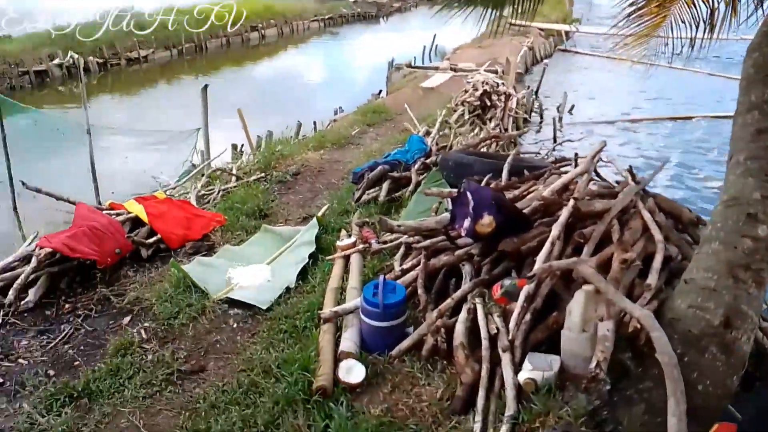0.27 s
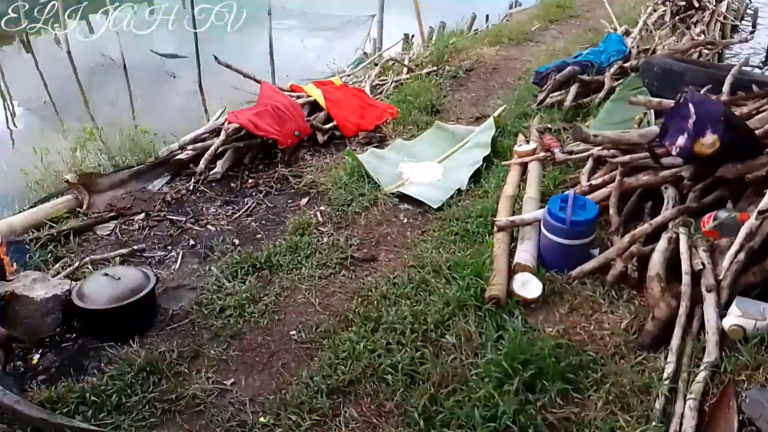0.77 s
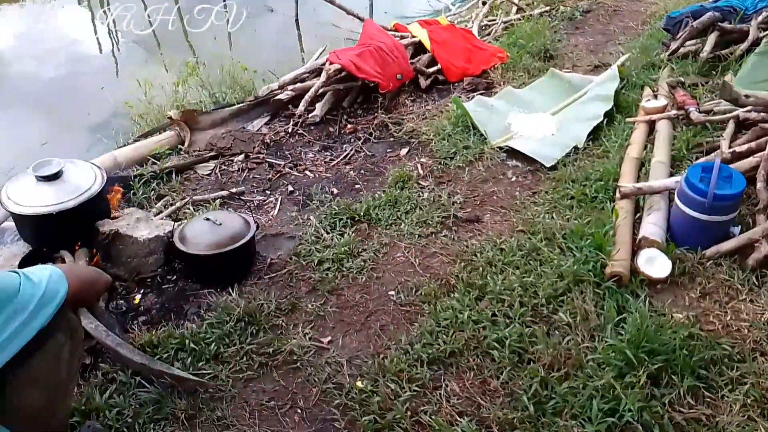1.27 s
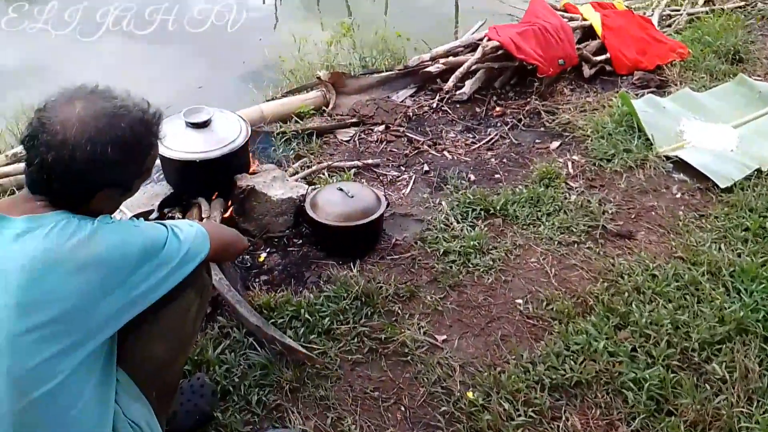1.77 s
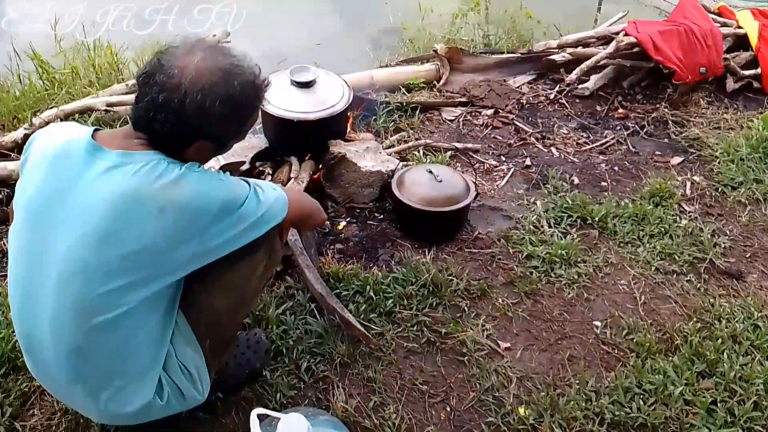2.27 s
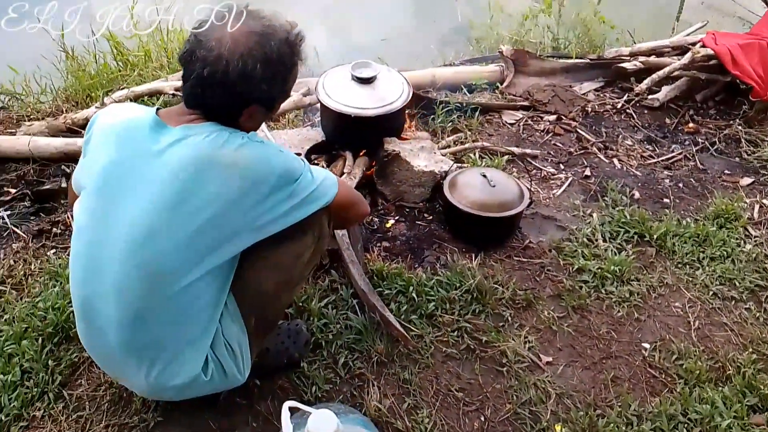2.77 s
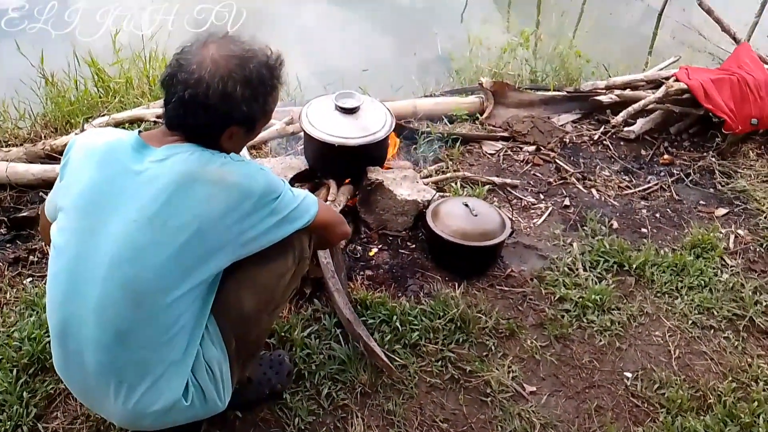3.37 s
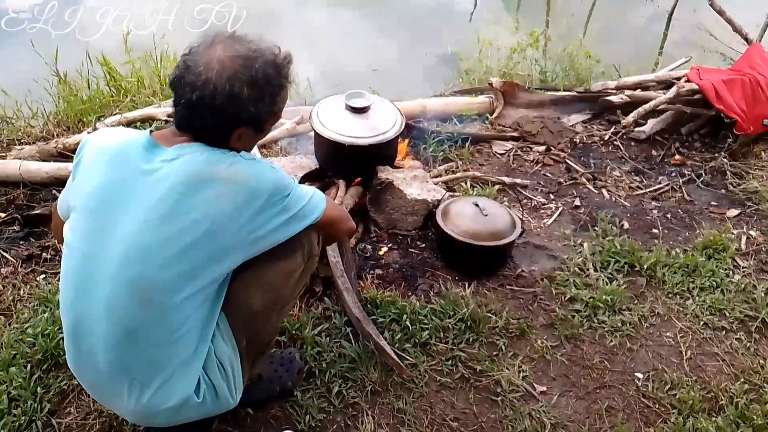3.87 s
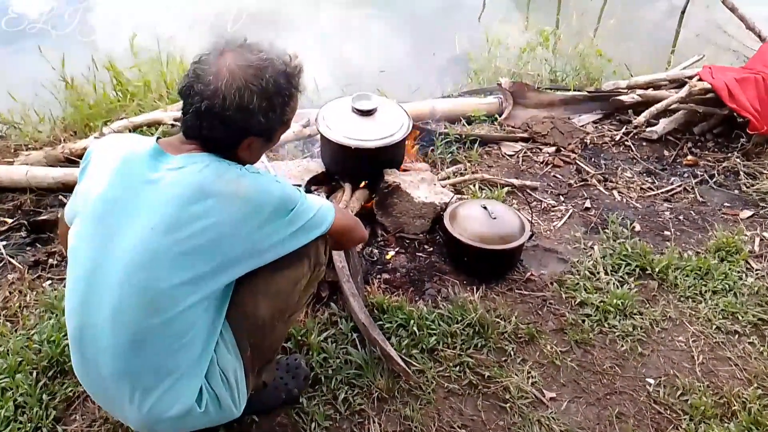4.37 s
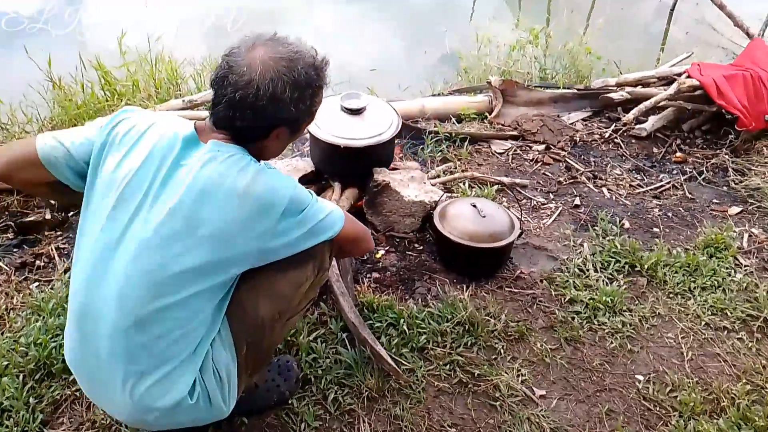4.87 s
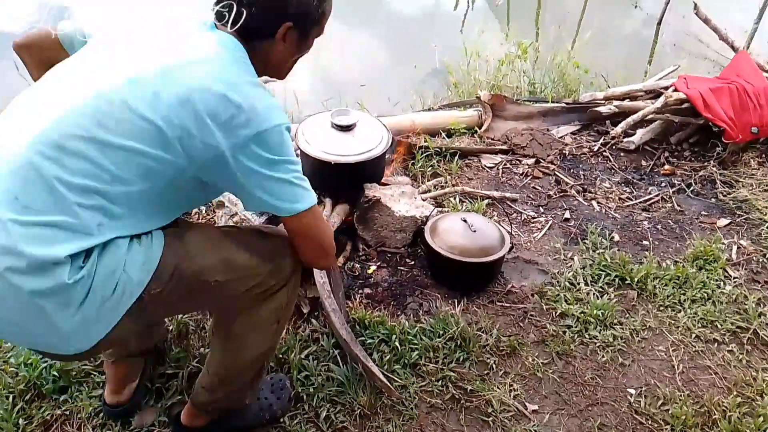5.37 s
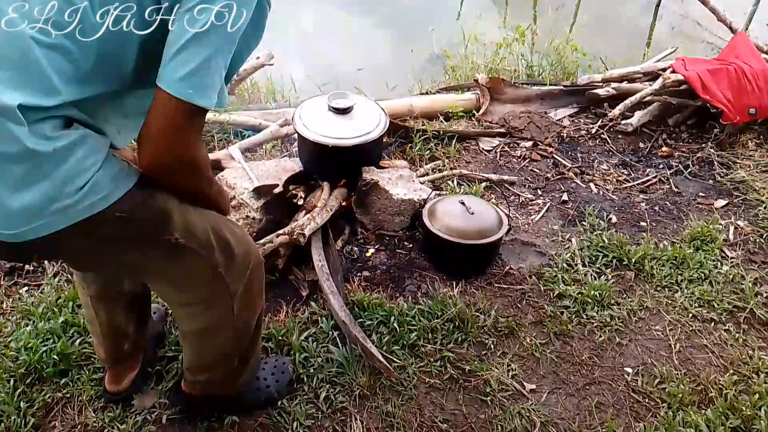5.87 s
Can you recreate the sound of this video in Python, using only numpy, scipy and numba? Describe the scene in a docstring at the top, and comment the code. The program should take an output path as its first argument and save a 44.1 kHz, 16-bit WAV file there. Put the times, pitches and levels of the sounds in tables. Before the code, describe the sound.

Outdoors at the waterside, a hand-held phone a few metres away hears a knife scaling a fish on a wooden board. From 0 s, short gritty strokes come several per second, with small gaps, scales popping in a dense dry rattle; brief squeaks near 2 kHz slide at 0.8-1.1 s and about 2.1 and 2.4 s. Light phone taps fall around 0.6 s, a chattering wooden knock at 1.3 s, a softer bump at 2.45 s. Low scuffing thuds accompany the strokes. Scraping pauses from 2.8 to 4.2 s: wind puffs, faint fire ticks, quick bird chirps at 3.4 s, a sharp double tap at 3.85 s, a duller thump and knock at 4.15 s. Strokes resume, regular and raspy, until the end at about 6 s, with knocks near 4.75 and 5.5 s. A distant one-cylinder engine putters low throughout, weaker after 5 s, beneath soft steady hiss.

```python
"""A knife scales a fish on a wooden board in quick strokes, a few metres from a hand-held phone outdoors.
Scales pop off in a dense rattle of random clicks and grit, filtered into scrape, blade rasp and board ring.
Narrow sliding resonances squeak, low scuffs thud, and the knife chatters into the board.
Around it: pulses ringing a far one-cylinder exhaust, wind and outdoor hiss from filtered noise, fire ticks
from bursts of bright noise, pressure pulses for taps on the phone body, and gliding sines for birds."""
import sys
import numpy as np
from scipy import signal
from scipy.fft import rfft, irfft, next_fast_len
from scipy.io import wavfile
from scipy.ndimage import uniform_filter1d
from numba import njit

SR = 44100
rng = np.random.default_rng(int(sys.argv[2]) if len(sys.argv) > 2 else 0)


def to_wav(s):
    """Save 16-bit WAV."""
    ch = np.atleast_2d(s).T  # columns
    pcm = np.round(np.clip(ch, -1, 1) * 32767)  # PCM
    wavfile.write(sys.argv[1], SR, pcm.astype(np.int16))


N = 269892
T = np.arange(N) / SR  # s

# Strokes of the knife. Each row: peak time in seconds, rise in ms, fall in ms, base level in dB,
# blade rasp in dB over the base, upper rasp in dB over the base.
KNIFE_STROKES = [(0.025, 36, 39, -47, 2, -0.5), (0.178, 91, 31, -46, 0.5, -5),
                 (0.288, 67, 43, -48.5, 2, 0.5), (0.438, 75, 31, -46, 1.5, -1),
                 (0.801, 56, 51, -46, -9, -3), (0.91, 45, 54, -49, 1, 2), (1.051, 57, 29, -50, 6, 0),
                 (1.19, 86, 57, -48.5, 4, -10), (1.571, 65, 28, -49.5, 6, 3), (1.695, 88, 78, -50, 5, -4),
                 (1.95, 39, 15, -62, 15, -2), (2.062, 64, 50, -46, 4, -1.5), (2.179, 48, 75, -46, 4.5, -7),
                 (2.324, 50, 48, -52, 10, -8), (2.461, 65, 24.5, -44.5, 5, -12),
                 (2.549, 47, 64, -46.5, 6.5, 2), (2.706, 72, 38, -46, 5.5, -12),
                 (2.791, 21, 20, -55.5, 6, -5), (4.29, 87, 39.4, -50, -1, -2.5),
                 (4.431, 54, 39, -48, 1.5, -7), (4.555, 55, 37.5, -45.5, 4, -15),
                 (4.686, 53, 30, -48.5, 1.5, 1.5), (4.814, 45, 40, -47, 7.5, -11),
                 (4.93, 46, 41, -50, 1.5, -5), (5.071, 60, 26, -43.5, 3, -6),
                 (5.183, 65, 43, -49, -0.5, 2.5), (5.336, 72, 38, -47, 3.5, -10),
                 (5.695, 55, 52, -46, 4.5, -4), (5.803, 34, 90, -49.5, 3, -11),
                 (5.938, 38, 46, -49.5, 2.5, -5), (6.058, 43, 93, -47, 2.5, -7.5)]
# Colour of the scrape. Each row: frequency in Hz, relative level in dB.
SCRAPE_COLOUR = [(300, -3), (1000, -11.5), (2200, 0), (3600, -4.5), (4800, -8.5), (6300, -3), (8000, -16.5),
                 (11000, -29), (15500, -43.5)]
# Ringing modes of the board. Each row: frequency in Hz, relative level in dB, 60 dB decay time in seconds.
BOARD_MODES = [(696, -2, 0.067), (1031, -2, 0.075), (1166, -1, 0.043), (1450, -3, 0.015),
               (2063, 12.5, 0.032), (2914, 9.5, 0.06)]
# The fish dragged against the board. Each row: peak time of the high scuff in seconds, its level in dB,
# low scuff in dB over the high one.
DRAG_THUDS = [(.18, -46.5, -13), (.432, -45.5, -9), (1.195, -45.5, -11), (1.697, -43.5, -15),
              (2.217, -40, -8.5), (2.457, -42.5, -6), (2.713, -37.5, -10.5), (4.276, -38.5, -13),
              (4.558, -38.5, -3), (4.824, -42, 1.5), (5.069, -40, -2), (5.335, -48.5, -6),
              (5.83, -44.5, -3), (6.078, -42, -6.5)]
# Firing of the far engine. Each row: time in seconds, firings in Hz, level in dB.
ENGINE_COURSE = [(0, 23.06, -46.5), (0.598, 23.58, -47), (1.5, 23.08, -45), (2.6, 23.4, -46),
                 (3.5, 23.53, -52.5), (4.548, 23.84, -48.5), (5.201, 21.65, -61), (6.12, 21.46, -54)]
# Resonances of the exhaust. Each row: frequency in Hz, width in Hz, relative level in dB.
EXHAUST_MODES = [(115.2, 75, -0.5), (140.2, 21.8, 1), (222, 720, -10), (361, 120, -14.5)]
# Puffs of wind on the microphone. Each row: peak time in seconds, peak level in dB.
WIND_PUFFS = [(1.31, -47), (2.6, -45.5), (3.1, -41.5), (3.42, -38.5), (3.65, -46), (3.86, -39), (4.11, -38),
              (4.71, -41.5), (5.18, -43.5), (6.09, -42.5)]
# Colour of the outdoor hiss. Each row: frequency in Hz, relative level in dB per Hz.
AIR_COLOUR = [(70, -23), (110, 1.5), (340, -11.5), (460, -19), (1040, -18.5), (1440, -15.5), (2300, -15.5),
              (3500, -22.5), (4650, -29.5), (6500, -28.5), (8500, -47.5), (15500, -59)]
# Louder fire ticks. Each row: start in seconds, starting level in dB.
LOUD_TICKS = [(3.187, -53.5), (3.558, -55), (3.643, -54)]
# The blade catches on a scale and squeaks, sliding as the contact travels. Each row: middle in seconds,
# pitch there in Hz, level in dB, slide in percent per 10 ms.
BLADE_SQUEAKS = [(.165, 2390, -41.5, -1.5), (.41, 2260, -43, 3), (0.801, 2290, -34, -1.5),
                 (.828, 1840, -36.5, -4.5), (.89, 1840, -48, 6), (.925, 2250, -39.5, 1),
                 (1.043, 2030, -44, -2.5), (1.064, 1700, -42.5, -4), (1.548, 3530, -53, -0.5),
                 (1.576, 1720, -42.5, -4.5), (1.64, 1680, -43, 2), (2.046, 2340, -37, 1.5),
                 (2.068, 2374, -36.5, -1), (2.085, 1770, -41, -3.5), (2.157, 1780, -39.5, 8.5),
                 (2.432, 2230, -36.5, 0), (4.407, 1870, -41.5, 5), (4.8, 1900, -42, -1),
                 (4.935, 3430, -46.5, -2)]
# Taps on the phone body. Each row: time in seconds, pulse level in dB before the high-pass,
# nominal width in ms, direction as a sign.
PHONE_TAPS = [(0.606, -33, 0.75, 1), (0.625, -26, 0.29, -1), (.665, -22, 0.46, 1), (2.45, -18, 3.7, 1),
              (3.83, -18.5, 0.32, 1), (3.8611, -7, 0.55, 1), (3.868, -8.5, 0.14, -1),
              (4.156, -10, 10.5, -1)]
# Knife against the board. Each row: start in seconds, push strength in dB, chatter decay in ms,
# crack push in dB over the push that rings the board.
BOARD_KNOCKS = [(1.283, -21, 4.8, 5), (1.292, -16.5, 10.7, 6.5), (1.305, -25.5, 5.4, 5),
                (1.328, -26, 28, 5), (4.152, -44, 9.3, 25.5), (4.742, -32, 23, 12), (5.526, -33, 9.8, 9.5)]
# Bird notes. Each row: start in seconds, length in ms, start, middle and end pitch in Hz, level in dB.
BIRD_NOTES = [(1.925, 115, 4100, 5050, 6240, -60.5), (3.356, 25, 3640, 6060, 3800, -51.5),
              (3.379, 20, 5730, 4265, 3930, -47.5), (3.4, 23, 4790, 3960, 3230, -56),
              (3.417, 20, 4500, 3900, 3140, -52), (3.441, 34, 4200, 3600, 3050, -59),
              (5.57, 23, 5160, 5760, 5900, -58)]

UPPER_HZ, UPPER_WIDTH_HZ = 3635, 1420  # second, higher band of the rasp
SCUFF_LOW_HZ, SCUFF_HIGH_HZ, SCUFF_WIDTH = 573, 984, 0.31  # width as a share of the pitch
SCUFF_LEAD_S = 0.014  # the low scuff comes first
AIR_DB = -47
SQUEAK_MS, SQUEAK_WIDTH_HZ = 13, 180  # spread of the bell-shaped swell, width of the resonance
RATTLE_DB, RATTLE_MS, RATTLE_HZ = -9, 3.4, 1170  # drive over the tap, decay and pitch of the case rattle
TOP_HZ, OFFSET = 15500, .0154  # top edge and steady offset of the converter


def undb(db):
    """dB to gain."""
    return np.exp(np.asarray(db) * np.log(10) / 20)


def unit(x):
    """Scale to rms 1."""
    return x / np.sqrt(np.mean(x ** 2))


def steady(hz):
    """A pitch that stays put for the whole scene."""
    return np.full(N, float(hz))


def colour(x, shape):
    """Filter by a spectrum of (Hz, dB) points, rms 1."""
    hz, db = np.transpose(shape)
    size = next_fast_len(N)
    log_hz = np.log(np.fft.rfftfreq(size, 1 / SR) + 1)
    gain = undb(np.interp(log_hz, np.log(hz), db, left=-90))
    return unit(irfft(rfft(x, size) * gain, size)[:N])


@njit
def band(x, hz, width):
    """State-variable band-pass whose centre moves every sample."""
    y, b, l = np.empty(len(x)), 0., 0.
    for i in range(len(x)):
        g, k = np.tan(np.pi * hz[i] / SR), width / hz[i]
        v = (b + g * (x[i] - l)) / (1 + g * (g + k))
        b, l, y[i] = 2 * v - b, l + 2 * g * v, k * v
    return y


def tuned(x, hz, width):
    """A resonance applied twice, rms 1."""
    return unit(band(band(x, hz, width), hz, width))


def walk(rate):
    """Random levels held 1 / rate s and slewed twice, rms 1."""
    k = int(SR / rate)
    steps = np.repeat(rng.standard_normal(N // k + 1), k)
    return unit(uniform_filter1d(uniform_filter1d(steps, k), k)[:N])


def add(out, s, x):
    """Mix a short sound in at time s."""
    i = int(s * SR)
    out[i:i + len(x)] += x[:N - i]


def bump(peak_s, rise_ms, fall_ms, edge_db):
    """A swell, edge_db down at its rise and fall times."""
    x = (T - peak_s) * 1000 / np.where(T < peak_s, rise_ms, fall_ms)
    return undb(-edge_db * x ** 2)


def pops(rate, spread_db, grit):
    """Scales letting go at random, of uneven size, over rubbing grit."""
    chance, side, size = rng.random((3, N))
    clicks = (chance < rate / SR) * np.sign(side - .5) * undb(-spread_db * np.log(size + 0.019))
    return unit(unit(clicks) + grit * rng.standard_normal(N))


def stroke_swells():
    """The swell of each knife stroke, for the scrape and the two bands of rasp."""
    scrape, rasp, upper = np.zeros((3, N))
    for s, rise, fall, db, rasp_db, upper_db in KNIFE_STROKES:
        scrape += undb(db) * bump(s, rise, fall, edge_db=12.5)
        linger = undb(db) * bump(s, rise, fall, edge_db=9.5)  # the rasp lingers as the blade slows and turns
        rasp += undb(rasp_db) * linger
        upper += undb(upper_db) * linger
    return scrape, rasp, upper


def twangs():
    """Scales twang as they bend free: short rings across the blade's range, flaring in patches and drifting."""
    grit = rng.standard_normal(N)
    out = np.zeros(N)
    for hz in 1500 * 1.2 ** np.arange(8):
        flare = undb(4.2 * walk(80))
        out += flare * tuned(grit, hz * (1 + 0.04 * walk(40)), 240.0)
    return unit(out)


def scrape_hiss(twang):
    """Broad scrape: dense pops and twangs, coloured and made uneven."""
    hiss = colour(pops(2500, spread_db=3.5, grit=1.1) + 0.3 * twang, SCRAPE_COLOUR)
    crisp = band(hiss, steady(10000), 8000.0)
    hiss += (undb(3.4 * walk(14)) - 1) * crisp  # the crisp top comes and goes
    return undb(4.0) * hiss * undb(1.74 * walk(90))


def blade_rasp(twang, rasp, upper):
    """The edge catches and slips over rows of scales, heard through two wandering resonances."""
    catch = undb(1.8 * walk(110))
    rows = pops(1500, spread_db=2.0, grit=0.59) * catch + 0.53 * twang
    main_band = tuned(rows, 2150 * (1 + 0.12 * walk(25)), 1400.0)
    upper_band = tuned(rows, UPPER_HZ * (1 + 0.092 * walk(15)), float(UPPER_WIDTH_HZ))
    return rasp * main_band + upper * upper_band


def board(force):
    """The board's modes, rung by a force."""
    out = 0
    for k, (hz, db, t60) in enumerate(BOARD_MODES):
        pole = np.exp(2j * np.pi * hz / SR - np.log(1000) / (t60 * SR))
        out = out + (-1) ** k * undb(db) * signal.lfilter([1], [1, -pole], force).imag
    return out


def thuds(drag):
    """Fish dragged against the board: a low scuff, then a high one, both from the same grit."""
    low = tuned(drag, steady(SCUFF_LOW_HZ), SCUFF_WIDTH * SCUFF_LOW_HZ)
    high = tuned(drag, steady(SCUFF_HIGH_HZ), SCUFF_WIDTH * SCUFF_HIGH_HZ)
    out = np.zeros(N)
    for s, db, low_db in DRAG_THUDS:
        high_scuff = bump(s, 15.3, 18.0, edge_db=11.0) * high
        low_scuff = bump(s - SCUFF_LEAD_S, 20.0, 29.0, edge_db=7.0) * low
        out += undb(db) * (high_scuff + undb(low_db) * low_scuff)
    return out


def scaling():
    """Each stroke is a broad scrape plus the rasp of the blade and the board's ring, with thuds among them."""
    scrape, rasp, upper = stroke_swells()
    twang = twangs()
    drag = pops(900, spread_db=1.5, grit=0.68)
    ring = undb(-3.5) * unit(board(drag))
    return scrape * (scrape_hiss(twang) + ring) + blade_rasp(twang, rasp, upper) + thuds(drag)


def engine():
    """Slightly uneven firings ring the exhaust."""
    s, hz, db = np.transpose(ENGINE_COURSE)
    firing_hz = np.interp(T, s, hz) * (1 + 0.003875 * walk(2.92))
    cycle = np.floor(np.cumsum(firing_hz) / SR).astype(int)
    strength = undb(0.3 * rng.standard_normal(200))
    pulses = np.diff(cycle, prepend=0) * strength[cycle]
    pipe = np.zeros(N)
    for k, (mode_hz, width, mode_db) in enumerate(EXHAUST_MODES):
        pipe += (-1) ** k * undb(mode_db) * unit(band(pulses, steady(mode_hz), float(width)))
    dull = signal.sosfilt(signal.butter(2, 420, fs=SR, output="sos"), pipe)
    return unit(dull) * undb(np.interp(T, s, db))


def wind():
    """Low buffeting: a light breeze with short puffs."""
    rumble = [(8, -13), (20, 0.0), (45, 1.5), (90, -6.0), (200, -16.0), (500, -41.0), (2000, -73)]  # Hz, dB
    low = colour(rng.standard_normal(N), rumble)
    breeze = undb(-48.5 + 2.2 * walk(18))
    puffs = sum(undb(db) * bump(s, 43.0, 36, edge_db=4.5) for s, db in WIND_PUFFS)
    return low * (breeze + puffs)


def air():
    """Steady hiss whose middle octaves drift a little on their own."""
    hiss = colour(rng.standard_normal(N), AIR_COLOUR)
    drift = sum(band(hiss, steady(hz), hz * .7) * .15 * walk(5) for hz in 500. * 2 ** np.arange(4))
    return unit(hiss + drift) * undb(AIR_DB)


def fire():
    """A faint crackle of short hissy ticks, a few of them louder."""
    sparks = undb(-96.0) * abs(pops(60, spread_db=2.0, grit=0))
    for s, db in LOUD_TICKS:
        add(sparks, s, undb([db]))
    puff = signal.lfilter([1], [1, -np.exp(-1 / (.002 * SR))], sparks)  # decay constant of 2 ms
    return tuned(rng.standard_normal(N), steady(7300), 3500.0) * puff


def squeaks():
    """Each catch is a puff of grit in one narrow, sliding resonance."""
    out = np.zeros(N)
    t = np.linspace(-50, 50, int(.1 * SR))  # ms
    grits = rng.standard_normal((len(BLADE_SQUEAKS), len(t)))
    for (s, hz, db, slide), grit in zip(BLADE_SQUEAKS, grits):
        ring = tuned(grit, hz * np.exp(slide * t / 1000), SQUEAK_WIDTH_HZ)
        ring = ring * np.exp(-(t / SQUEAK_MS) ** 2 / 2)
        core_rms = np.sqrt(np.mean(ring[abs(t) < SQUEAK_MS] ** 2))
        add(out, s - .05, undb(db) * ring / core_rms)
    return out * undb(3 * walk(160))  # broken by the rows of scales


def taps():
    """Pressure pulses in the phone body; the vent lets them swing back below rest, the case rattles after."""
    out, shake = np.zeros((2, N))
    t = np.arange(int(.03 * SR)) / SR * 1000  # ms
    noises = rng.standard_normal((len(PHONE_TAPS), len(t)))
    for (s, db, ms, sign), noise in zip(PHONE_TAPS, noises):
        x = t / (0.71 * ms)
        pulse = (x * np.exp(1 - x)) ** 2
        add(out, s - 0.33 * ms / 1000, sign * undb(db) * pulse)
        rattle = undb(db + RATTLE_DB) * np.exp(-t / RATTLE_MS) * noise
        add(shake, s, rattle / (1 + ms))  # a soft, wide tap rattles less
    case = steady(RATTLE_HZ), 2200.0
    out += band(band(shake, *case), *case)
    return signal.sosfilt(signal.butter(2, 90, "high", fs=SR, output="sos"), out)  # the vent


def knocks():
    """The knife chatters into the board: short rough pushes, heard as a crack and through the modes."""
    force, crack = np.zeros((2, N))
    t = np.arange(int(.06 * SR)) / SR * 1000  # ms
    noises = rng.standard_normal((len(BOARD_KNOCKS), len(t)))
    for (s, db, ms, crack_db), noise in zip(BOARD_KNOCKS, noises):
        rough = noise + 1.65 * (t < .5)  # a firm first contact of half a millisecond
        push = undb(db) * np.exp(-t / ms) * rough / np.sqrt(ms)
        add(force, s, push)
        add(crack, s, undb(crack_db) * push)
    tone = steady(2100), 2600.0
    ring = undb(-30.0) * board(uniform_filter1d(force, size=12))
    return ring + band(band(band(crack, *tone), *tone), *tone)


def birds():
    """Warbling near-sine notes with a smeared echo off the water and banks."""
    out = np.zeros(N)
    warble, flutter = 1 + 0.034 * walk(300), undb(3.0 * walk(250))
    for s, ms, *hz, db in BIRD_NOTES:
        x = np.linspace(0, 1, int(ms * SR / 1000))
        pitch = np.interp(x, [0, .33, 1], hz) * warble[int(s * SR):][:len(x)]
        tone = np.sin(2 * np.pi * np.cumsum(pitch) / SR)
        add(out, s, np.sqrt(2) * undb(db) * np.sin(np.pi * x) ** 0.15 * tone)
    t = np.arange(int(.12 * SR)) / SR
    tail = rng.standard_normal(len(t)) * np.exp(-t / 0.03)
    return out * flutter + undb(-26.5) * signal.fftconvolve(out, tail)[:N]


def scene():
    """All sources at the one microphone."""
    fish = scaling() + squeaks() + knocks()
    surroundings = engine() + wind() + air() + fire() + birds()
    return (fish + taps() + surroundings)[None]


def record(dry):
    """The converter adds its offset and cuts the top."""
    return signal.sosfilt(signal.ellip(10, .2, 80, TOP_HZ, fs=SR, output="sos"), dry) + OFFSET


dry = scene()
out = record(dry)
to_wav(out)
```